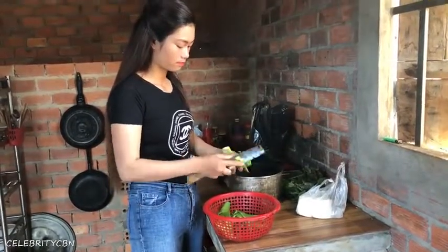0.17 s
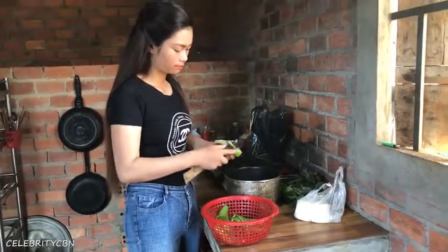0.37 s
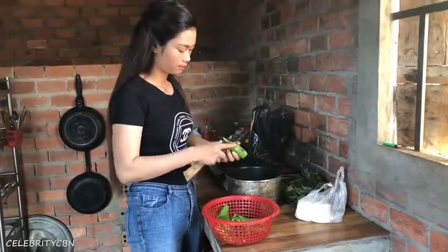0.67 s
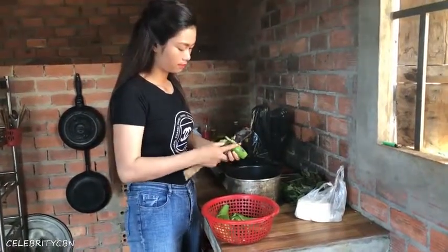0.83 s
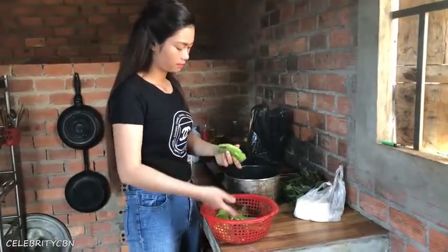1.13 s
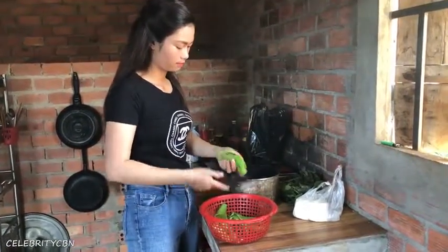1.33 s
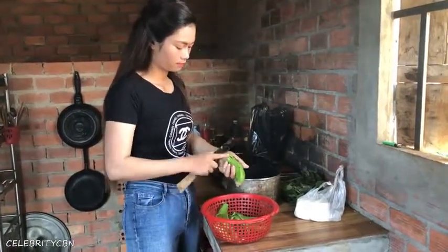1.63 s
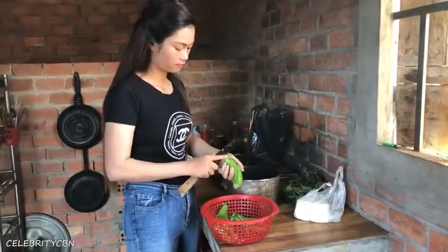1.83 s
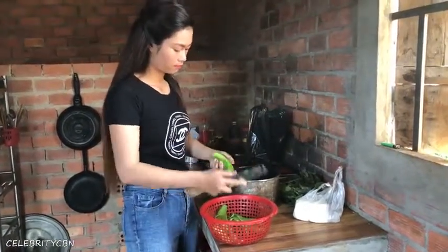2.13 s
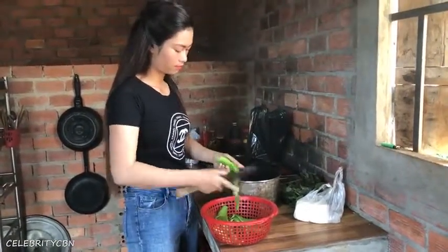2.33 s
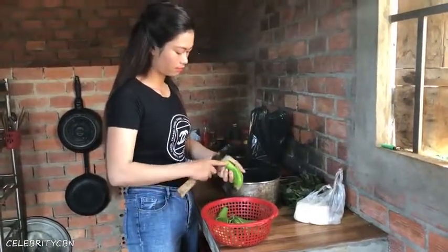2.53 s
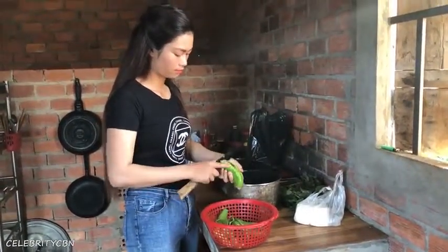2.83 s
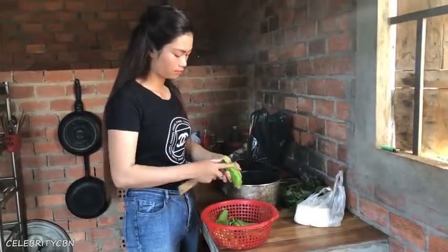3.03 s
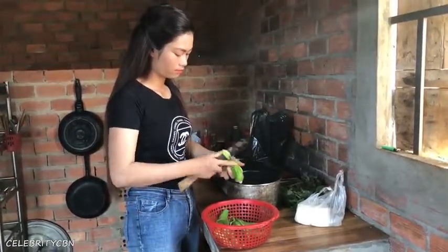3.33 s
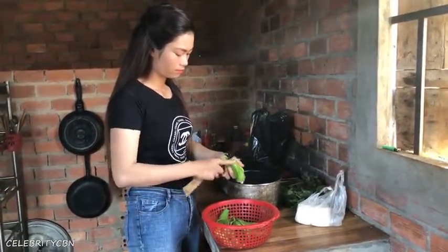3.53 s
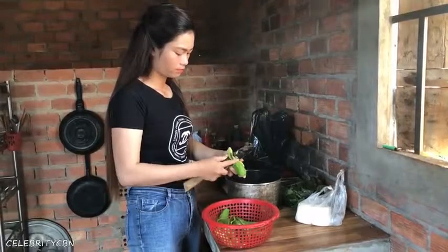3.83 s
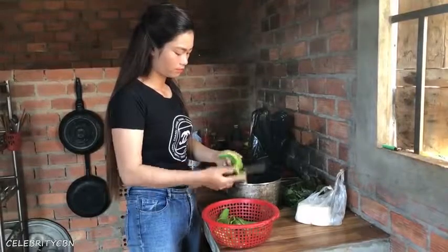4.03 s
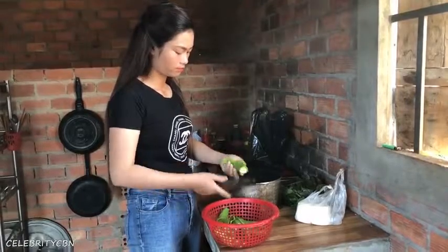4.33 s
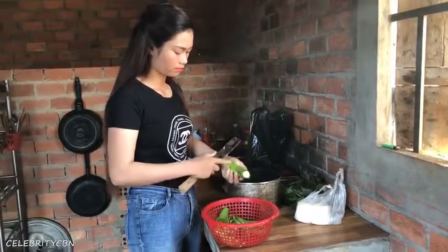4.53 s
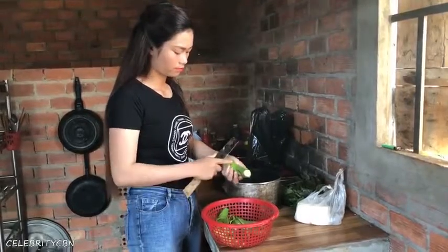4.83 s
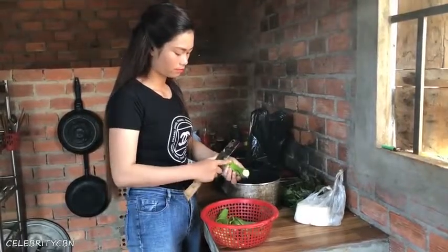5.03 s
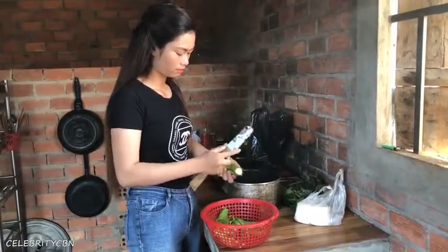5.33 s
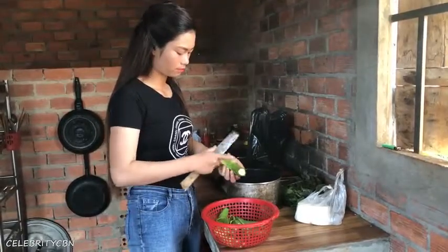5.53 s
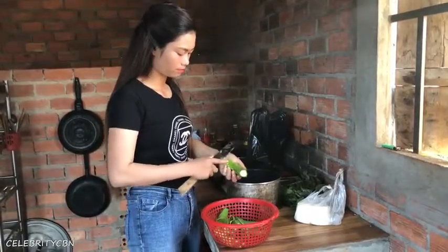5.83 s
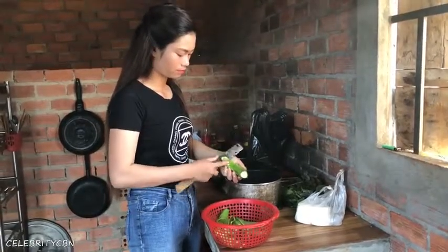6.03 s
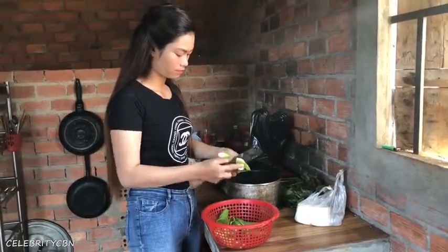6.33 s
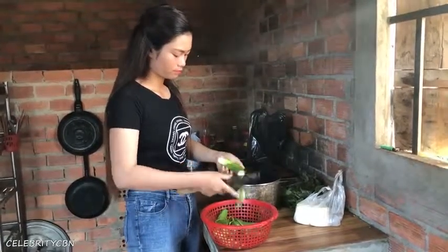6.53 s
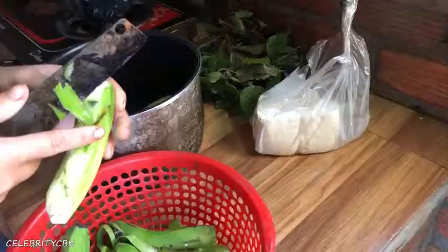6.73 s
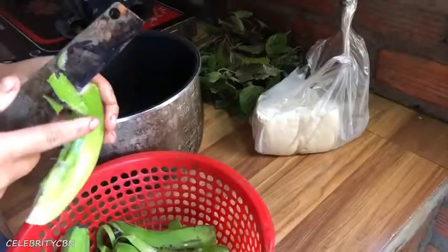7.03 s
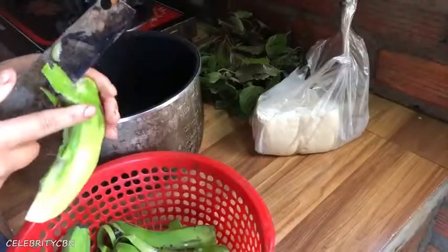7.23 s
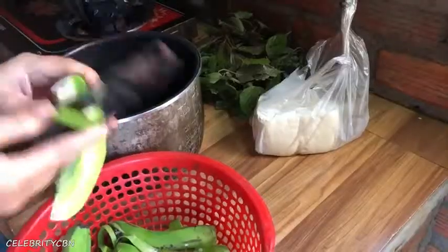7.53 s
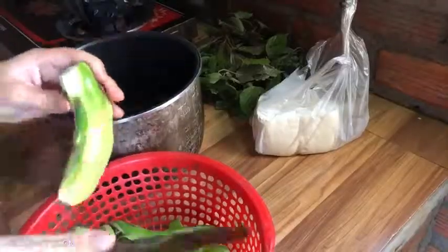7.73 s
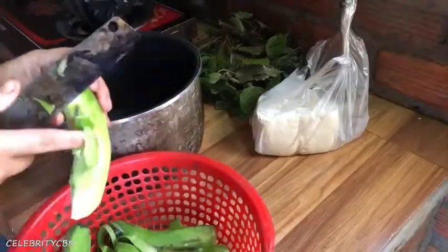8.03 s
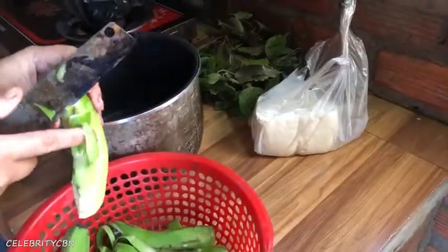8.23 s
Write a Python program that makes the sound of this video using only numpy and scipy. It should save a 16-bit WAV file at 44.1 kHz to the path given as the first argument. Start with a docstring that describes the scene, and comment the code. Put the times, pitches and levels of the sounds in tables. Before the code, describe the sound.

A broad knife strips peel from green bananas in short, crisp, crackling tears, with light knocks, blade ticks and a faint low engine hum.

```python
"""A cleaver strips green bananas in a brick kitchen: each stroke tears the peel in a dense crackle of fibres.
Strokes are clumped random clicks through filters for body, fizz and flap; thick fibres snap on top.
Filtered noise makes the blade's ticks, the knocks and the room hiss; bumps are short low sines and a pop
is a decaying step. Something hollow skids and rattles once, and a distant engine hums in harmonics.
Late on, the sound cuts to a microphone close to the hands: the tearing changes colour, the room recedes."""
import sys
import numpy as np
from scipy import signal
from scipy.fft import rfft, irfft
from scipy.io import wavfile
from scipy.ndimage import uniform_filter1d

SR = 44100
rng = np.random.default_rng(int(sys.argv[2]) if len(sys.argv) > 2 else 0)


def unload_wav(signal):
    """Save mono or channel-first audio to the path in sys.argv[1] as 16-bit WAV at rate SR, clipped to [-1, 1]."""
    wavfile.write(
        sys.argv[1],
        SR,
        np.round(np.clip(np.atleast_2d(signal).T, -1, 1) * 32767).astype(np.int16),
    )


N = 369558
TIME = np.arange(N) / SR
CLOSE_AT = 6.77  # s, from here on the microphone is close to the hands

# Colour of the peel's body as it tears. Each row: frequency in Hz, gain in dB.
TEAR_COLOUR = [(150, -10), (500, -9.5), (1100, -6.5), (1700, -3.5), (2200, 1), (3400, 1.5), (5100, 1),
               (6400, -8), (9000, -6.5), (15000, -45)]
# Colour of the bright, crisp part of the tearing. Each row: frequency in Hz, gain in dB.
FIZZ_COLOUR = [(1500, -41), (4500, -20.5), (6800, 1), (8800, 8.5), (12000, 2.5), (14000, -1), (16000, -7.5)]


def gain_of(db):
    """Decibels to amplitude."""
    return 10 ** (np.asarray(db) / 20)


def evened(x):
    """Scales to rms 1."""
    return x / np.sqrt(np.mean(x ** 2) + 1e-20)


def read(points, hz):
    """A spectrum's value at hz, on a log axis."""
    f, value = np.transpose(points)
    return np.interp(np.log(hz + 1), np.log(f + 1), value)


def add(mix, s, sound):
    """Mixes a sound in at time s."""
    part = mix[max(round(s * SR), 0):][:len(sound)]
    part += sound[:len(part)]


def coloured(x, points):
    """Shapes x by a gain curve in dB over frequency."""
    gain = gain_of(read(points, np.fft.rfftfreq(len(x), 1 / SR)))
    return irfft(rfft(x) * gain, len(x))


def ring_of(points, size=1024):
    """The causal (minimum-phase) click, of energy 1, that has this spectrum."""
    log_gain = np.log(gain_of(read(points, abs(np.fft.fftfreq(size, 1 / SR)))))
    click = np.fft.ifft(np.exp(np.conj(signal.hilbert(log_gain)))).real[:size // 2]
    return click / np.linalg.norm(click)


def filtered(x, points):
    """Lets every click in x ring with this spectrum."""
    return signal.lfilter(ring_of(points), 1, x)


def resonate(x, hz, width):
    """A resonance of gain 1 that can follow a frequency curve."""
    turn = np.exp(2j * np.pi * np.cumsum(hz * np.ones(len(x))) / SR)
    r = np.exp(-np.pi * width / SR)
    # shift the resonance down to 0 Hz, smooth there, and shift back
    return 2 * (turn * signal.lfilter([1 - r], [1, -r], x / turn + 1e-18)).real


def mode(x, hz, width):
    """Two equal resonances in a row, for steeper skirts, at rms 1."""
    return evened(resonate(resonate(x, hz, width), hz, width))


def wander(length, rate):
    """Slow chance of about unit size: random points, rate per second, joined by lines."""
    knots = rng.standard_normal(int(length / SR * rate) + 2)
    return np.interp(np.arange(length) / SR * rate, np.arange(len(knots)), knots)


def played(rows):
    """Start time and every column of a curve table, sample by sample."""
    s, *columns = np.transpose(rows)
    t = np.arange(s[0], s[-1], 1 / SR)
    return s[0], *(np.interp(t, s, c) for c in columns)


def crackle(length, per_s, spread_db, clump_db):
    """Clumped clicks of uneven size, at an even mean level."""
    size_db = spread_db * np.minimum(rng.exponential(1, length), 4) + clump_db * wander(length, 263.0)
    struck = rng.random(length) < per_s / SR
    clicks = gain_of(size_db) * rng.choice([-1, 1], length) * struck
    return clicks / np.sqrt(abs(uniform_filter1d(clicks ** 2, size=1100)) + 1e-4)


def dappled(x, patchy_db):
    """Small patches of time and pitch each get their own level: narrow bands come and go."""
    z = signal.stft(x, SR, nperseg=256, noverlap=192)[2]
    blur = np.outer(np.hanning(6), np.hanning(22))
    patches = evened(signal.fftconvolve(rng.standard_normal(z.shape), blur, "same"))
    sound = signal.istft(z * gain_of(patchy_db * patches), SR, nperseg=256, noverlap=192)[1]
    return np.std(x) * evened(sound[:len(x)])


def stroke(start, length, tear_db, fizz_db, swell_db, top_hz, sag, flap_db):
    """Fibres part one after another, exciting the peel's body, a bright fizz and a flap that rings lower."""
    # The lifting flap's modes. Each row: multiple of its pitch, width of each resonance in Hz, level in dB.
    flap_modes = [(1, 435, -4), (1.8, 500, -30)]
    # The peel's body heard close up. Each row: frequency in Hz, gain in dB.
    close_colour = [(150, -14), (600, -8), (1100, -12.5), (1450, -2.5), (2500, -2), (3400, 0), (4400, 0.5),
                    (5400, -0.5), (6300, -14), (9000, -31), (15000, -44.5)]
    bite_s = 0.0091  # the edge takes this long to bite
    tear_release, fizz_release = 306, 380  # dB per s, how the crackle dies when the pull stops
    dulling = 37  # dB per s, the fizz fades against the tearing as the edge sinks in
    fizz_swell = 0.97  # share of the pull's swell that the fizz follows
    flap_growth = 39  # dB per s, the flap rings more freely as it lifts

    t = np.arange(round(length * SR) + SR // 8) / SR
    progress, after = np.minimum(t / length, 1), np.maximum(t - length, 0)
    close = start > CLOSE_AT
    fibres = crackle(len(t), per_s=2200 if close else 3400, spread_db=1.5, clump_db=0.4)

    flap_hz = top_hz * 2 ** (-sag * progress)
    flap = sum(gain_of(db) * mode(fibres, k * flap_hz, width) for k, width, db in flap_modes)
    lift = gain_of(flap_db + flap_growth * length * (progress - 2.0))
    body = evened(filtered(fibres, close_colour if close else TEAR_COLOUR))
    tear = (body + lift * flap) / np.hypot(1, lift * np.std(flap))  # keeps the level about even
    fizz = filtered(fibres, FIZZ_COLOUR)

    fizz_change_db = fizz_swell * swell_db - dulling * length
    tear_gain = gain_of(tear_db + swell_db * (progress - .5) - tear_release * after)
    fizz_gain = gain_of(fizz_db + fizz_change_db * (progress - .5) - fizz_release * after)
    bite = np.minimum(t / bite_s, 1)
    # each small patch of wet peel has its own colour
    return start, bite * dappled(tear_gain * tear + fizz_gain * fizz, patchy_db=2.8)


def air():
    """Room hiss with two faint bands, and a draught on the microphone, all from shaped noise."""
    # Colour of the hiss. Each row: frequency in Hz, gain in dB.
    hiss_colour = [(18, -19), (30, 0.5), (55, -4.5), (86, -9), (130, -9.5), (200, -15.5), (449, -18.5),
                   (583, -18), (811, -21), (1300, -23), (2460, -26.5), (4230, -28), (5230, -30.5),
                   (15500, -37)]
    # Faint bands in the hiss. Each row: centre in Hz, width of each resonance in Hz, level before the swell in dB.
    hiss_bands = [(2551, 610, -79), (5290, 760, -76)]
    # Slow rise and fall of the hiss. Each row: time in seconds, gain in dB.
    hiss_swell = [(0, 5.5), (.45, 1), (6.9, 1.43), (7.4, 2.5), (8.38, 1)]
    # Colour of the draught. Each row: frequency in Hz, gain in dB.
    draught_colour = [(1, -21.5), (4, 0.5), (12, 5), (16, -8), (23, -3), (27, -26), (33, -57), (120, -84)]

    hiss = coloured(rng.standard_normal(N), hiss_colour)
    high_pass = signal.butter(2, 200, "high", fs=SR, output="sos")
    hiss *= gain_of(-62.5) / np.std(signal.sosfilt(high_pass, hiss))  # level is set by the part above 200 Hz
    bands = sum(gain_of(db) * mode(rng.standard_normal(N), f, width) for f, width, db in hiss_bands)
    swell = gain_of(np.interp(TIME, *np.transpose(hiss_swell)) + 0.14 * wander(N, 31))
    draught = evened(coloured(rng.standard_normal(N), draught_colour)) * signal.windows.tukey(N, .01)
    return swell * (hiss + bands) + gain_of(-38.5) * draught


def tick(db, hz, t60):
    """A light touch on the blade: a bright decaying chiff that excites the steel's high resonances."""
    # Resonances of the steel. Each row: frequency in Hz, width in Hz, typical level in dB.
    blade = [(4644, 61, 10), (5830, 120, 6), (6600, 170, -1), (8470, 110, 7), (9300, 250, -4),
             (10630, 47, 0.5), (11700, 93, -1)]
    t = np.arange(SR // 3) / SR
    touch = rng.standard_normal(len(t)) * gain_of(-60 * t / t60)
    # chance levels: the resonances depend on where the blade is touched
    steel = sum(gain_of(level + 2.5 * rng.standard_normal()) * evened(resonate(touch, f, width))
                for f, width, level in blade)
    colour = [(hz / 3, -28), (hz / 2.2, -19), (hz / 1.19, -3), (hz, 0), (hz * 1.4, -4), (hz * 2, -13)]
    sound = filtered(evened(touch) + .6 * evened(steel), colour)
    return gain_of(db) * sound / np.std(sound[:SR // 100])


def pop():
    """A lone soft pop: a sudden step in the waveform that decays to zero."""
    at, fade = .3172, 0.021  # s; fade is the time to fall to 1/e
    return gain_of(-32) * (TIME >= at) * np.exp(-abs(TIME - at) / fade)


def engine(rows, orders):
    """Low harmonics of a slow engine, each wavering a little on its way through the walls."""
    s, fifth_hz, db = played(rows)
    turns = np.cumsum(fifth_hz) / 5 / SR
    hum = 0
    for k, level in orders:
        waver = gain_of(.9 * wander(len(turns), 5))
        hum = hum + gain_of(level) * waver * np.sin(2 * np.pi * (k * turns + rng.random()))
    return s, gain_of(db) * hum * signal.windows.tukey(len(hum), .01)


def snap(crack_db, fizz_db):
    """A thick fibre breaks: one crack and a few milliseconds of splinters."""
    t = np.arange(SR // 40) / SR
    splinters = (t == 0) + 0.085 * rng.standard_normal(len(t)) * np.exp(-t / 0.0074)
    crack, fizz = filtered(splinters, TEAR_COLOUR), filtered(splinters, FIZZ_COLOUR)
    return gain_of(crack_db) * crack / abs(crack).max() + gain_of(fizz_db) * fizz / abs(fizz).max()


def knock(db, hz, t60, ring_db):
    """A sharp blow, a short rattle of decaying noise, and the ring of what was struck."""
    t = np.arange(SR // 3) / SR
    blow = (t == 0) + 0.093 * rng.standard_normal(len(t)) * gain_of(-60 * t / t60)
    body = filtered(blow, [(100, 4), (500, 0.5), (1500, -3.5), (5200, -8.5), (6500, -19.5), (15000, -26)])
    sound = evened(body) + gain_of(ring_db) * mode(body, hz, hz / 8)
    return gain_of(db) * sound / abs(sound).max()


def bump(db, hz):
    """A soft bump: a low sine that swells for 10 ms and dies."""
    t = np.arange(SR // 4) / SR
    u = t / 0.01
    return gain_of(db) * u * np.exp(1 - u) * np.sin(2 * np.pi * hz * t)


def clatter(start, skid_db, rattle_db, boom_db):
    """One contact of a hollow thing: the skid dies first, its rattle and low resonances last longer."""
    # Colour of the skid. Each row: frequency in Hz, gain in dB.
    skid_colour = [(400, -19), (1100, -7), (1500, -7.5), (2000, 2.5), (2500, -7), (3200, -11), (3900, -5.5),
                   (4600, -3.5), (5200, -9.5), (6300, -10), (7600, -14.5), (8700, -12.5), (10000, -20),
                   (14000, -32)]
    # Resonances of the hollow thing. Each row: frequency in Hz, width of each resonance in Hz, level in dB.
    hollow = [(200, 79, -1), (265, 53, 0.5), (332, 49, -2.5), (391, 8, 2.5), (500, 53, -1.5),
              (602, 26, 2.5), (615, 17, 0), (674, 44, -1.5), (760, 59, -3.5), (1290, 460, -5),
              (1540, 320, 0), (1690, 55, -5), (1850, 155, -8), (1979, 590, -12)]
    rise_s = 0.013
    skid_fall, rattle_fall, boom_fall = 122, 91, 70  # dB per s

    t = np.arange(SR // 2) / SR
    contacts = crackle(len(t), per_s=9000, spread_db=1.0, clump_db=-1.0)
    rings = np.array([gain_of(db) * mode(contacts, f, width) for f, width, db in hollow])
    low = np.transpose(hollow)[0] < 1100  # Hz, boom below and rattle above
    skid = gain_of(skid_db - skid_fall * t) * dappled(filtered(contacts, skid_colour), patchy_db=0.5)
    rattle = gain_of(rattle_db - rattle_fall * t) * evened(rings[~low].sum(0))
    boom = gain_of(boom_db - boom_fall * t) * evened(rings[low].sum(0))
    return start, np.minimum(t / rise_s, 1) * (skid + rattle + boom)


def kitchen(x):
    """Dense reflections off brick, the extreme treble dying first."""
    # Decay of the room. Each row: frequency in Hz, time to fall 60 dB in seconds.
    room_decay = [(150, 1), (1000, 0.32), (4000, 0.46), (9000, 0.3), (15000, 0.1)]
    taps = rng.choice([-1., 1.], SR // 2) * (rng.random(SR // 2) < 3000 / SR)
    taps[:SR // 300] = 0  # no reflection in the first 3 ms
    hz, t, z = signal.stft(taps, SR, nperseg=256)
    decay = gain_of(-60 * t / read(room_decay, hz)[:, None])
    tail = signal.istft(z * decay, SR, nperseg=256)[1]
    return signal.fftconvolve(x, tail / np.linalg.norm(tail))[:N]


def scene():
    """Knife work in the room, over the steady background."""
    # Pulls of the blade through the peel. Each row: start in seconds, length in seconds, tearing level in dB,
    # fizz level in dB, swell over the pull in dB, flap pitch in Hz, flap sag in octaves, flap ring in dB.
    pulls = [ (0.0, 0.14, -55, -58.5, 0, 3200, .1, 1), (0.143, .072, -52.5, -64, 8.5, 2950, 0.18, 4),
             (0.728, 0.056, -57, -62, -2, 3500, .05, -11), (0.87, 0.17, -60.5, -62, 8, 3200, 0.36, -12),
             (1.831, 0.011, -57, -69, -3, 3600, .03, 3), (1.858, .012, -62, -69, 0, 3580, .03, 2),
             (1.894, .012, -57, -64, -2, 3600, .03, 1), (1.921, 0.013, -62, -63, 0, 3600, .03, 6),
             (1.984, 0.052, -50, -52.5, 2, 3300, 0.42, -2), (2.043, 0.086, -50, -50.5, 2, 2600, .1, -8),
             (2.145, 0.042, -55.5, -65, -2, 2480, 0.164, -14), (2.728, .02, -61.5, -65, -9, 3420, .03, -1),
             (2.864, 0.14, -59, -64, 2, 3570, .03, 0), (3.043, 0.036, -63, -62, 5, 3320, .05, -9),
             (3.115, 0.11, -54, -60, 5.5, 2760, 0.31, 2), (3.59, 0.066, -60.5, -63, 1, 3470, .03, -6),
             (3.723, 0.1, -58.5, -61, 5, 3550, .02, 0), (3.889, .085, -63, -63, 15, 2520, .03, 2),
             (3.972, 0.11, -52, -53.5, 2.5, 2560, .02, -2), (5.091, .025, -61.5, -67, 6, 3470, .03, -2),
             (5.178, 0.056, -55, -50.5, -5, 2400, .03, -22), (5.237, 0.047, -55.5, -61, 4, 3450, .03, -6),
             (5.911, .13, -61.5, -68, 9, 2800, .05, -17.5), (6.035, 0.092, -56, -56.5, 0, 2550, .05, -21),
             (6.305, .051, -45.5, -49.5, 0.5, 2650, 0.19, 1), (7.124, 0.21, -63.5, -69.5, 0, 1900, .25, 2),
             (7.392, 0.11, -63.5, -69.5, 9, 2610, .05, -8),
             (7.513, 0.047, -48, -51.5, -2.5, 5000, 0.13, -6), (7.568, .02, -44, -49.5, 1.5, 4440, .05, -4),
             (7.587, 0.065, -48, -52.5, -5.5, 2070, .1, -8), (8.336, 0.043, -54, -71, 5, 3200, .05, -23), ]
    # Light touches on the steel. Each row: start in seconds, level in dB, centre in Hz, noise t60 in seconds.
    touches = [(0.0114, -50, 12000, 0.19), (4.3155, -53.5, 5830, 0.4), (4.3883, -57.5, 6460, 1),
               (5.344, -62.5, 5900, 0.34), (6.8324, -64, 4900, 0.4), (6.9, -54.5, 5470, 0.28),
               (7.1312, -64, 4800, 0.32), (7.9892, -50.5, 8470, 0.34)]
    # Distant engine, from two places. Each row: time in seconds, fifth harmonic in Hz, overall gain in dB.
    engine_far, engine_near = [(.32, 141.2, -60.5), (3.95, 140.4, -58), (4.6, 141.7, -55.5),
                               (6.77, 142, -56)], [(6.8, 140, -51.5), (6.88, 127, -61),
                                                   (7.42, 127.1, -55.5), (8.1, 131, -58),
                                                   (8.38, 133.4, -62.5)]
    # Its harmonics at each place. Each row: multiple of the firing rate, level in dB.
    orders_far, orders_near = [(2, -4.5), (4, -6.5), (5, -2.5), (6, -21.5), (7, -15.5), (8, -15.5),
                               (9, -25)], [(2, 6.5), (3, -14), (4, -2.5), (5, 0.5), (6, -4.5),
                                                   (7, -15), (8, -12), (9, -11.5), (10, -17.5)]
    # The thickest fibres snapping. Each row: start in seconds, crack peak in dB, fizz peak in dB.
    breaks = [(0.8856, -38, -50.5), (0.9033, -38, -50.5), (1.034, -32, -41), (1.9934, -32, -50),
              (2.014, -35, -29), (2.0374, -33, -40), (2.1212, -39, -46), (3.9994, -36, -45),
              (5.2134, -55, -32), (5.2654, -47, -34), (6.2048, -41, -43), (6.229, -42, -43),
              (6.298, -36, -41), (6.3254, -30, -29), (6.3491, -37, -27.5), (7.553, -26, -31.5),
              (7.5802, -35.5, -44.5), (7.6124, -42, -40.5)]
    # Knocks of fruit, peel and handle. Each row: start in seconds, peak in dB, ring in Hz,
    # t60 of the rattle in seconds, ring strength in dB.
    blows = [(1.193, -44, 2620, .05, -12), (2.5605, -40, 600, 0.086, -10), (4.48, -47.5, 964, 0.94, 0),
             (5.355, -50.5, 1600, 0.27, 1.5), (6.6365, -39.5, 1880, 0.026, -8),
             (6.654, -36, 3830, 0.052, -10), (6.715, -40.5, 407, 0.11, -4), (6.8325, -40, 770, 0.019, -9),
             (7.78, -48, 900, 0.33, -8), (8.118, -40.5, 3600, 0.18, -7), (8.145, -39, 390, 0.064, -7),
             (8.280, -43.5, 4300, 0.19, -3)]
    # Soft bumps against the counter. Each row: start in seconds, level in dB, pitch in Hz.
    thuds = [(1.245, -48.5, 84), (1.745, -49.5, 75), (2.645, -56, 71), (5.012, -52, 99),
             (5.888, -48, 74.74), (6.552, -44.5, 84.5), (6.635, -44, 99.6), (6.765, -39, 79),
             (6.825, -47, 93.6)]
    # Something hollow touches, skids, lands and rocks once. Each row: start in seconds, then the
    # starting levels of skid, rattle and boom in dB.
    contacts = [(4.49, -55, -68, -70), (4.55, -41, -67, -56), (4.615, -50, -50, -45),
                (4.68, -69, -58, -52.5), (4.775, -74, -59, -57.5)]

    knife, rest = np.zeros(N), air() + pop()
    for row in pulls:
        add(knife, *stroke(*row))
    for table, voice, mix in (breaks, snap, knife), (blows, knock, knife), (touches, tick, rest), (thuds, bump, rest):
        for s, *row in table:
            add(mix, s, voice(*row))
    for row in contacts:
        add(rest, *clatter(*row))
    add(rest, *engine(engine_far, orders_far))
    add(rest, *engine(engine_near, orders_near))
    wet = np.where(TIME < CLOSE_AT, gain_of(-6.5), gain_of(-20.0))  # close up, the room recedes
    return (knife + kitchen(wet * knife) + rest)[None]


def record(dry):
    """The recorder's band limit: a steep low-pass at 15780 Hz."""
    low_pass = signal.firwin(1023, 15780, window=("kaiser", 9), fs=SR)
    return signal.oaconvolve(dry, low_pass[None], "same")


dry = scene()
out = record(dry)
unload_wav(out)
```